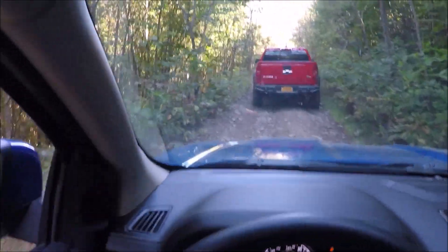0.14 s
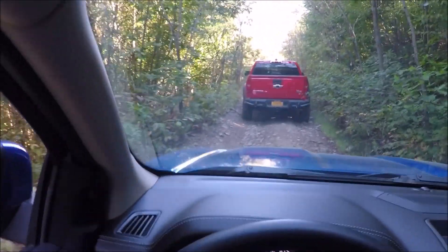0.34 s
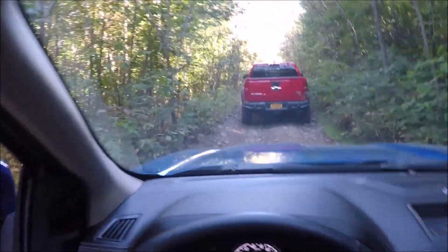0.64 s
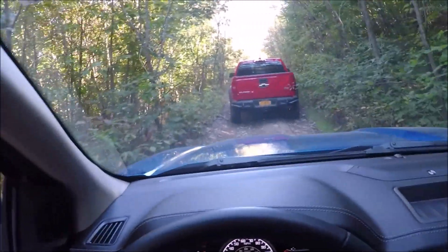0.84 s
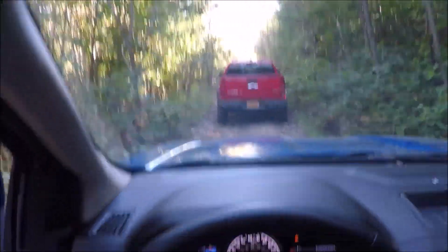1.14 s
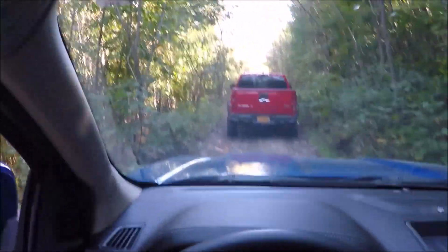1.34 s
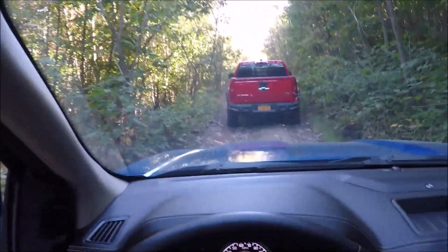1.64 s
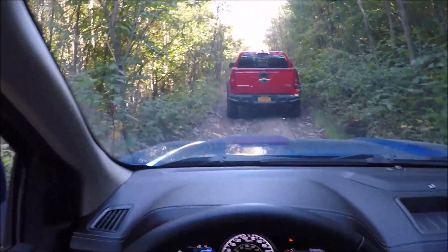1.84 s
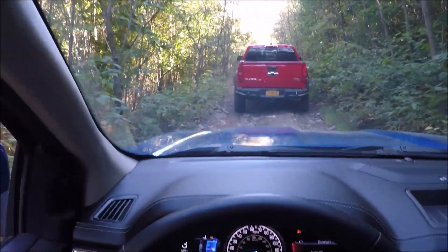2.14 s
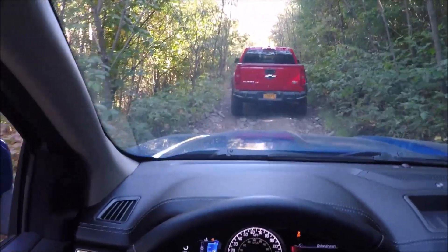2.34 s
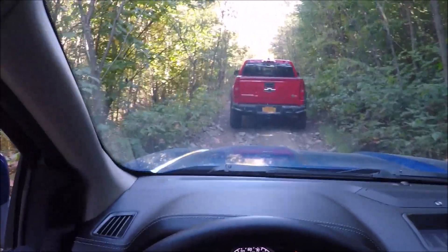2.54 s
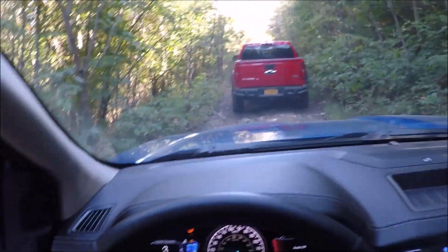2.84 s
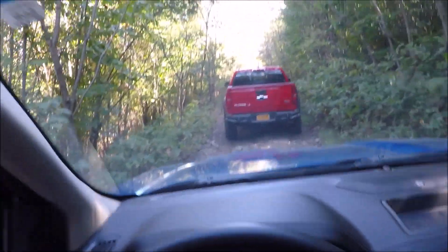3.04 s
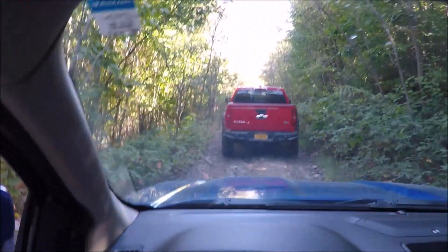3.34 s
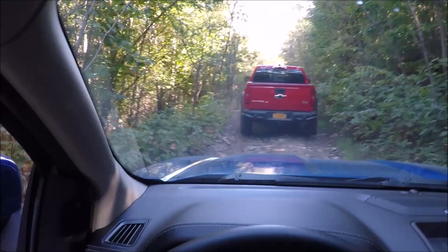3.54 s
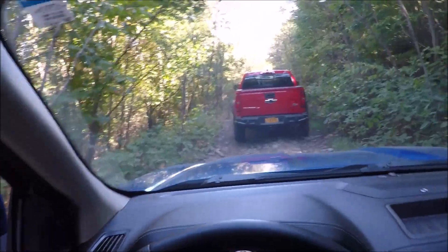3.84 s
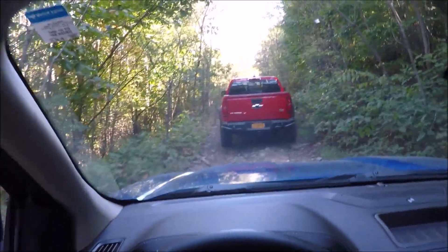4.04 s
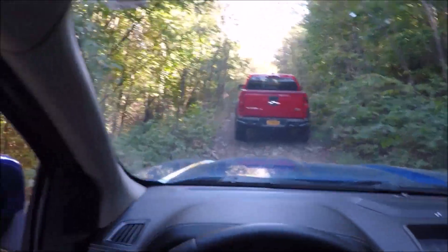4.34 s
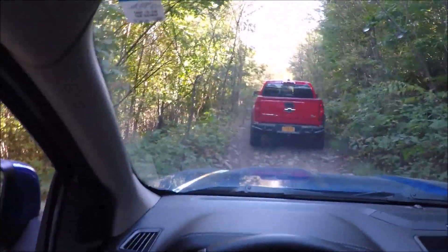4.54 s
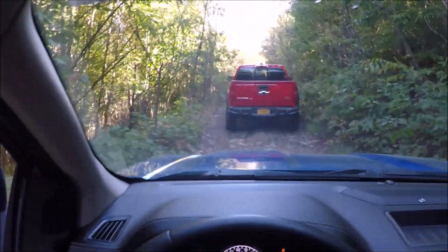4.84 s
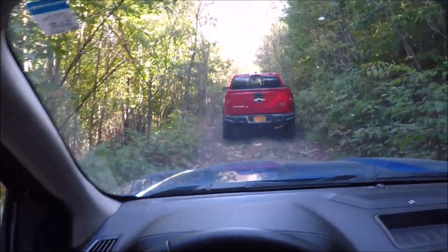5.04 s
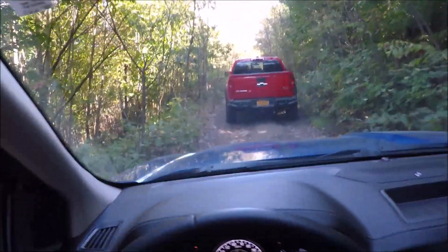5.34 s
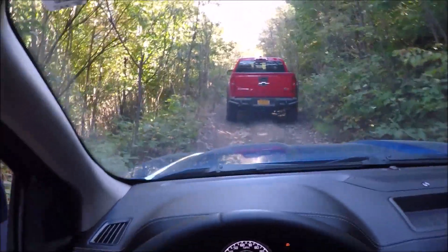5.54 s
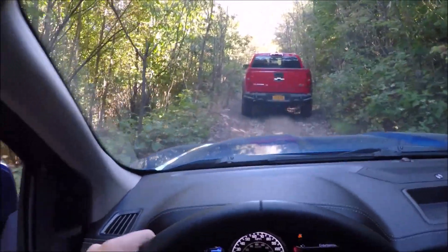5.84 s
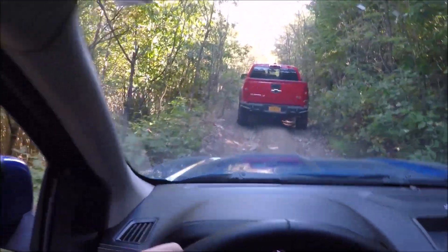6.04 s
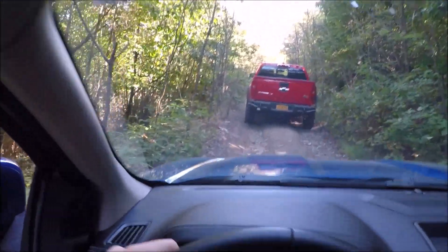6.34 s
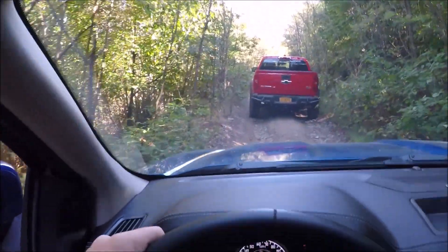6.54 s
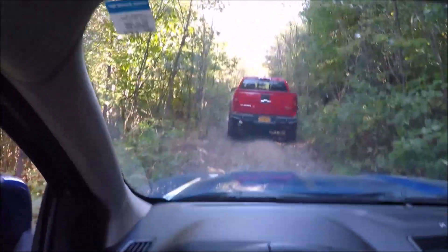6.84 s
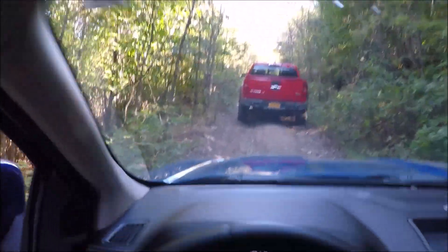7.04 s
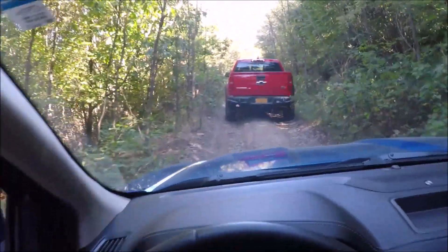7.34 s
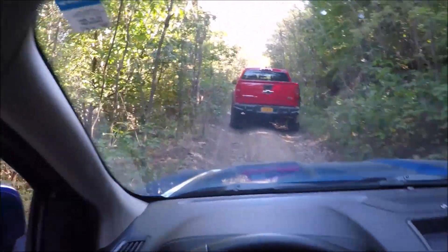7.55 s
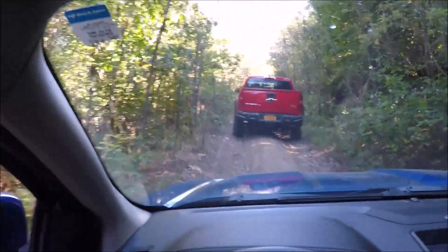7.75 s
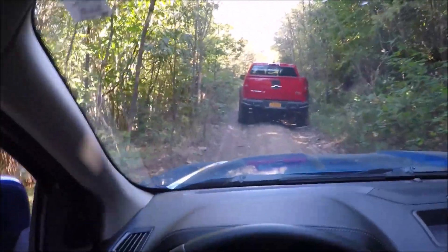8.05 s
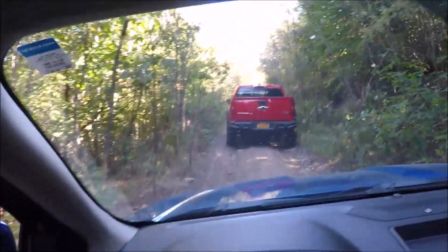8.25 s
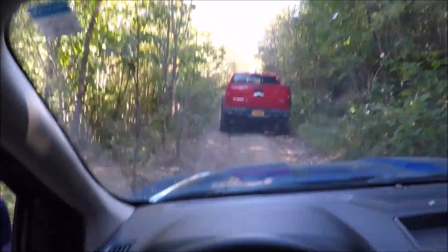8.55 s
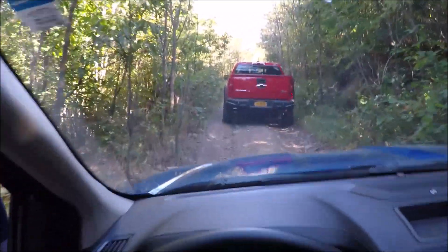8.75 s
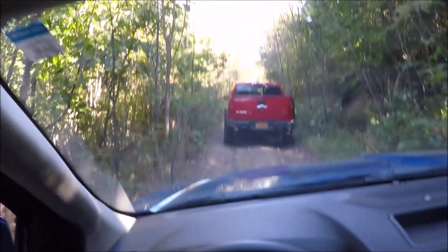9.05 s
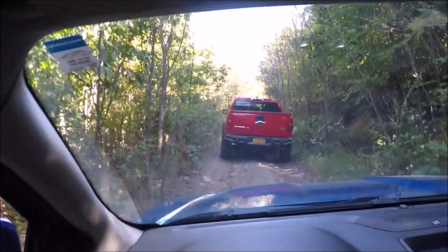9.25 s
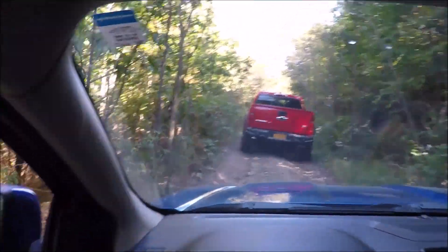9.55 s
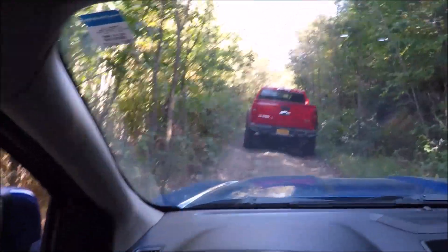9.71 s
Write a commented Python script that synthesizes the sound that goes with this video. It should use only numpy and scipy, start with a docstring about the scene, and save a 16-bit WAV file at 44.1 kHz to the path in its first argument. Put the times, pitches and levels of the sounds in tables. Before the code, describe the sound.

Inside a vehicle cab, a low engine drone sags then pulls again as tyres crunch over dirt, with heavy body booms, knocks and plastic rattles.

```python
"""A truck crawls along a dirt trail

Heard inside the cab: the six-cylinder engine, built from sine tones, eases off, then pulls again with a drone.
Shaped noise makes the body boom, the tyres crunch and the brush sweep along the side.
Loose things knock with short thuds that ring the cab, and bursts of noise rattle the trim.
Thin gliding tones are a twig squeaking on the paint."""
import sys
import numpy as np
from scipy import signal
from scipy.fft import rfft, irfft, next_fast_len
from scipy.io import wavfile
from scipy.ndimage import uniform_filter1d, map_coordinates

SR = 44100
rng = np.random.default_rng(int(sys.argv[2]) if len(sys.argv) > 2 else 0)


def inscribe(sig):
    """Save sig as 16-bit PCM at rate SR to the path in sys.argv[1].

    A 1-D sig is mono; a 2-D sig holds one channel per row.
    Samples are clipped to [-1, 1] before scaling.
    """
    pcm = np.round(np.clip(np.atleast_2d(sig).T, -1, 1) * 32767)
    wavfile.write(sys.argv[1], SR, pcm.astype(np.int16))


N = 435706  # length in samples

# Spectrum shapes of the noises; only the shape counts: f/Hz, level/dB
BOOM_COLOUR = [(10, -40), (18, -16.5), (24, -3), (28, 4), (33, -1), (39, -1.5), (46, -7.5), (56, -17),
               (75, -31), (110, -45), (200, -67)]
FLOOR_COLOUR = [(40, -11.5), (65, 6), (100, 3), (130, 2.5), (143, 5), (156, -0.5), (195, -1.5), (235, -8.5),
                (265, -1), (310, -11.5), (400, -13.5), (700, -50)]
TYRE_COLOUR = [(180, -0.5), (330, -1), (410, 0.5), (490, 0.5), (580, 3), (730, -3), (1000, -3.5),
               (1250, -9.5), (1550, -17.5), (2500, -23), (6000, -67)]
TWIG_COLOUR = [(700, -41), (1500, 2), (2100, 1), (2900, 2.5), (3700, 0.5), (4400, -5.5), (5600, -5.5),
               (6400, -5.5), (7200, -19), (10000, -41)]
LEAF_COLOUR = [(2000, -15), (5000, 2), (7500, 2), (10500, 3.5), (11500, -2), (14500, -1), (16000, -12)]
# Resonances of the door trim and dashboard: f/Hz, width/Hz, level/dB
TRIM_MODES = [(885, 175, 18.5), (1900, 295, 8.5), (2140, 226, 10.5), (2740, 750, 7), (3550, 710, 5),
              (5450, 1070, -2.5), (6000, 670, -0.5), (10040, 1100, -10.5), (13500, 3800, -13)]
# Air in the cab, lifting or dulling tones that pass through: f/Hz, width/Hz, gain/dB
AIR_MODES = [(96.8, 13.4, 13.5), (113, 5.2, -3), (153, 7.1, 3), (260, 7.4, -9), (543.3, 12, 7.5),
             (629, 69, 4.5)]
# Ringing modes of the cab after a knock: f/Hz, level/dB, time to fall 60 dB/s
CAB_MODES = [(118, 5, 0.29), (164.2, 8.5, 0.15), (200, -6, 0.04), (252, -10, 0.072), (337, 4, 0.084),
             (442, 1.5, 0.051), (560, 0.5, 0.091), (624, 0, 0.094), (755, -9, 0.12), (902, -2.5, 0.067)]
# Pace over the dirt, given as tyre noise: t/s, level/dB
PACE = [(0, -48.5), (1.4, -48.5), (2.2, -53), (3.0, -52), (3.9, -50.5), (4.9, -48.5), (6.1, -48),
        (7.9, -47), (8.5, -48.5), (9.88, -47.5)]
# Bushes pressing on the side: t/s, length/s, extra twig scrape/dB, extra leaf hiss/dB
BUSHES = [(-.05, 0.063, 10.5, 14.5), (0.416, 0.22, 2, 4.5), (0.979, 0.2, 3, 4.5), (1.419, .14, 4.5, 4),
          (6.333, 0.33, 4, 5), (6.654, 0.29, 3, 1.5), (6.96, 0.34, 4, 4)]
# Single branches dragging past: t/s, length/s, level/dB, centre f/Hz
BRANCHES = [(0.815, 0.1, -52.5, 3960), (0.045, 0.068, -59, 13000), (1.132, 0.04, -60, 12100),
            (1.453, 0.13, -51, 3150), (4.343, 0.067, -52.5, 2820), (7.118, 0.066, -46.5, 3069),
            (9.449, 0.053, -51, 3030), (9.493, 0.054, -48.5, 7950), (9.544, 0.029, -52, 8500)]
# Twig squeaks, before waver and grip: t/s, length/s, start f/Hz, end f/Hz, level/dB
SQUEAKS = [(0.83, .016, 6230, 6200, -54), (0.852, .026, 6230, 6100, -55), (1.364, .026, 6400, 6330, -55),
           (1.393, 0.035, 6300, 6200, -52), (1.669, 0.058, 6370, 6240, -49),
           (1.719, 0.029, 6430, 6100, -50), (1.747, .026, 8520, 8460, -65)]
# Plastic trim rattles: t/s, level/dB, centre f/Hz, width/Hz, time to fall 60 dB/s
RATTLES = [(0.707, -42, 1750, 900, 0.03), (0.715, -47, 1950, 900, 0.045), (0.834, -43, 4850, 6500, 0.058),
           (0.873, -52, 3400, 3000, 0.027), (0.895, -45.5, 3400, 3500, 0.025),
           (.957, -42, 9000, 13200, 0.058), (.959, -42, 3000, 1200, 0.04), (1.932, -46, 2613, 4026, 0.051),
           (2.888, -48.5, 2395, 3014, 0.049), (3.818, -44, 2697, 1500, 0.05),
           (3.819, -48.5, 6500, 9000, 0.05), (3.8746, -49, 1900, 1800, 0.041),
           (3.918, -53, 12000, 6040, 0.027), (4.049, -39.5, 7540, 9810, 0.041),
           (4.049, -29, 2710, 1300, 0.022), (4.054, -37, 3505, 2480, 0.029),
           (4.403, -42, 2400, 3000, 0.048), (4.71, -39, 3400, 6010, .04), (4.767, -47, 3300, 3500, 0.096),
           (4.866, -46, 4490, 6990, .025), (5.013, -46.5, 2716, 2986, 0.072),
           (5.061, -41, 3717, 5000, 0.12), (5.0933, -40.5, 2800, 2000, 0.084),
           (5.0932, -44, 5700, 4500, 0.088), (5.36, -43.5, 2640, 3600, 0.11),
           (5.88, -46.5, 2100, 2500, 0.047), (5.974, -45, 2200, 2500, .05),
           (6.724, -39.5, 2440, 3010, 0.045), (6.7304, -42, 2800, 2000, 0.03),
           (6.737, -43, 2400, 2500, 0.045), (7.033, -45, 6100, 3500, 0.099),
           (7.148, -37.5, 7000, 10000, .045), (7.147, -34.5, 3400, 2600, 0.063),
           (7.158, -39, 2100, 1400, 0.043), (7.627, -40, 2010, 1300, 0.037),
           (7.741, -44.5, 1900, 1500, 0.047), (8.288, -44, 4455, 2000, .03), (8.293, -52, 3700, 2000, .035),
           (8.649, -52, 8800, 5000, .035), (8.679, -49.5, 5400, 2200, 0.047), (8.7525, -46, 2620, 800, .05),
           (9.447, -50.5, 5700, 1200, 0.055), (9.521, -46, 6500, 9000, .025)]
# Dull knocks of suspension and cargo: t/s, thud level/dB, f/Hz, cab ring level/dB, trim shake level/dB
KNOCKS = [(0.2857, -35, 650, -44, -63), (0.6953, -38, 870, -41, -45), (0.7033, -19.5, 140, -33, -60),
          (0.7103, -10, 229, -32.5, -51), (.7185, -28, 620, -40, -48), (0.7296, -21, 160, -40, -56),
          (0.7693, -8.5, 41.4, -56, -55), (0.8342, -36, 600, -42.5, -58), (1.0504, -27, 760, -41, -47),
          (3.085, -26, 540, -47, -58), (3.0932, -19, 430.2, -45, -58), (3.0947, -32.5, 950, -45, -56),
          (3.1006, -23.5, 190, -41, -68), (3.818, -31, 159.8, -38.5, -60), (4.711, -29, 225, -42, -52),
          (4.049, -24, 427, -38, -44), (4.0581, -20.5, 484, -33, -39), (5.094, -32, 800, -44, -51),
          (5.138, -36, 700, -40, -42), (5.1445, -35, 720, -42, -46), (5.261, -29, 570.7, -40, -53),
          (5.2648, -30, 566.8, -44, -61), (7.139, -33, 899.6, -41, -47), (7.161, -28, 900, -44, -41),
          (7.6254, -33, 870, -38, -40), (7.6305, -28, 952, -42, -48), (7.965, -33, 620, -42, -54),
          (8.1522, -32, 900.6, -39, -41), (8.864, -32.5, 805, -42, -50), (9.585, -32, 419.9, -42, -56),
          (9.7, -35, 330.3, -40, -62)]
# Roughness of the ground, given as body boom before its random wobble: t/s, level/dB
GROUND = [(0, -23), (.5, -20), (.68, -21.5), (.745, -28), (.8, -22), (1.05, -21), (1.45, -23), (1.62, -36),
          (1.75, -22), (1.98, -20.5), (2.15, -25.5), (2.42, -21), (2.66, -26), (2.76, -20.5), (2.87, -41),
          (3.02, -23), (3.3, -25), (3.4, -34), (3.5, -25.5), (3.9, -26), (4.22, -33), (4.5, -25),
          (5.08, -26), (5.25, -21.5), (5.5, -26), (5.9, -22), (6.25, -26), (6.8, -22), (7.17, -25.5),
          (7.35, -29), (7.65, -19), (7.85, -25), (8.17, -17.5), (8.3, -25.5), (8.5, -19), (9.88, -21)]
# Ruts that set the body heaving: t/s, length/s, level/dB
RUTS = [(.785, .09, -14.5), (1.116, 0.11, -18), (5.549, 0.15, -16), (6.397, 0.16, -17),
        (7.262, 0.21, -19.5), (8.379, .18, -20.5), (8.67, 0.26, -19), (9.15, .17, -20), (9.498, 0.17, -19)]
# Engine speed and effort: t/s, firing rate f/Hz, base level/dB
ENGINE = [(0, 96.1, -34.5), (.45, 92.64, -37), (.75, 94.8, -33), (1.05, 88.62, -38), (1.5, 82.85, -39.5),
          (2.1, 71.44, -39), (3.0, 64, -38), (3.45, 62.87, -38.5), (3.75, 80.6, -34), (4.0, 88.32, -37),
          (4.4, 84.4, -35), (4.8, 87.83, -33.5), (5.25, 92.66, -43), (5.75, 94.74, -41), (6.3, 95.84, -54),
          (7.0, 102.6, -50.5), (7.6, 105.8, -38), (8.05, 114.1, -34), (8.25, 115.3, -40),
          (8.47, 110.6, -34), (8.72, 115.3, -35), (9.1, 110.1, -35.5), (9.88, 105.3, -40)]
# Engine overtones: multiple of the firing rate, level over the base level/dB (before the cab air)
OVERTONES = [(1.5, -14.5), (2, -20.5), (2.5, -21), (4, -26.5), (5, -28.5), (6, -34)]
# Rumble at half the firing rate: t/s, level/dB
RUMBLE = [(0, -40), (1.2, -43), (1.7, -30.5), (2.3, -33), (2.85, -35.5), (3.2, -31), (3.4, -36),
          (3.55, -30), (3.95, -27.5), (4.45, -26), (4.75, -27.5), (5.2, -30), (6.1, -32.5), (6.9, -42),
          (7.5, -36), (8.2, -32), (9.0, -34), (9.88, -34.5)]
# Extra tones of a labouring engine: multiple of the firing rate, level over the rumble/dB
LABOUR = [(5 / 6, -16.5), (4 / 3, -20), (3, -25.5), (3.5, -31.5), (4.5, -32), (5.5, -34), (11, -37.5)]
# Gear whines: multiple of the firing rate, level/dB (before the cab air)
WHINES = [(6.3, -66.5), (10.1, -71.5), (18.6, -74)]
# Drone of a belt-driven part, before throb and waver: t/s, f/Hz, level/dB
DRONE = [(0, 238.6, -43.5), (.75, 233, -46), (1.5, 215.8, -50.5), (3.4, 161.4, -58.5), (4.0, 212.7, -55),
         (4.8, 213.3, -57), (5.3, 221.7, -46), (5.6, 226, -50.5), (6.0, 230, -50), (6.32, 232.8, -43),
         (6.4, 246, -46), (6.5, 253, -44.5), (6.7, 260.7, -52.5), (6.85, 263.8, -41.5), (7.0, 264.7, -45),
         (7.17, 266.7, -34.5), (7.35, 269, -38), (7.68, 273.5, -35.5), (7.75, 276, -44), (7.81, 279.9, -35),
         (7.98, 291.2, -37.5), (8.3, 293.8, -41), (8.62, 295.4, -40.5), (8.83, 292, -35), (9.0, 284, -46.5),
         (9.2, 282.2, -47), (9.26, 280, -39), (9.35, 280, -42), (9.5, 279, -37.5), (9.6, 278.2, -39.5),
         (9.68, 271, -39), (9.88, 272.1, -37)]

PAN_DB = -38.5  # floor pan at the mean pace
# Twigs and leaves at the mean pace, outside the bushes; dB they gain per dB of pace
TWIG_DB, TWIG_FOLLOWS = -59.5, 0.71
LEAF_DB, LEAF_FOLLOWS = -71.5, 0.39
BUSH_ATTACK_S, BUSH_RELEASE_S = 0.034, 0.061
RUT_ATTACK_S, RUT_RELEASE_S = 0.019, 0.043
SHAKE_HZ, SHAKE_T60_S = 1990, 0.053  # the trim's answer to a knock
RATTLE_ATTACK_S = 0.0011
# Faint chance rattles; TICK_HZ is the middle of their pitch range
TICKS_PER_S, TICK_DB, TICK_HZ, TICK_T60_S = 0.89, -52, 3000, 0.069
PIECE_DB, PIECE_T60_S = -14.5, 0.031  # a rattling piece's own note, against its rattle level
TOP_HZ = 15300  # nothing above this is kept


def amp(db):
    """Turn decibels into gain."""
    return 10 ** (np.asarray(db) / 20)


def unit(x):
    """Scale to an average strength (rms) of 1."""
    return x / np.sqrt(np.mean(x ** 2) + 1e-20)


def curves(rows):
    """Draw straight lines between table rows: one curve for each column after the time."""
    s, *columns = np.transpose(rows)
    return [np.interp(np.arange(N) / SR, s, column) for column in columns]


def wobble(rate):
    """A smooth random curve through `rate` random points a second."""
    points = rng.standard_normal(int(N * rate / SR) + 4)
    return map_coordinates(points, [np.arange(N) * rate / SR])


def filtered(x, response):
    """Change the strength of each frequency in x by a response."""
    m = next_fast_len(len(x) + 8192)
    spectrum = rfft(x, m) * response(np.fft.rfftfreq(m, 1 / SR))
    return irfft(spectrum, m)[:len(x)]


def coloured(x, spectrum):
    """Shape x by a spectrum table, at rms 1."""
    f, db = np.transpose(spectrum)

    def response(hz):
        return amp(np.interp(np.log(hz + 1), np.log(f), db, left=-100, right=-100))

    return unit(filtered(x, response))


def resonance(f, centre, width):
    """Response of one damped vibration, strongest at its centre."""
    return 1j * f * width / (centre ** 2 - f * f + 1j * f * width)


def add(track, s, sound):
    """Mix a sound into the track from time s, in seconds."""
    part = track[round(s * SR):][:len(sound)]
    part += sound[:len(part)]


def grit(rate, spread_db, share):
    """Noise with a share of its power in sparse little impacts, `rate` a second."""
    happens = rng.random(N) < rate / SR
    strength = rng.standard_normal(N)
    hits = happens * strength * amp(spread_db * rng.standard_normal(N).clip(-2, 2))
    return np.sqrt(share) * unit(hits) + np.sqrt(1 - share) * rng.standard_normal(N)


def tone(hz, flutter_db, rate):
    """A sine of rms 1 whose strength flutters."""
    cycles = np.cumsum(hz) / SR + rng.random()
    return unit(np.sin(2 * np.pi * cycles) * amp(flutter_db * wobble(rate)))


def envelope(s, length, attack_s, release_s):
    """Gain that rises from time s, holds, and falls away once the length is over."""
    t = np.arange(N) / SR - s
    return np.clip(t / attack_s, 0, 1) * np.clip(1 - (t - length) / release_s, 0, 1)


def trim(f):
    """Response of the door trim and dashboard: several resonances with alternating signs."""
    return sum((-1) ** k * amp(db) * resonance(f, hz, width) for k, (hz, width, db) in enumerate(TRIM_MODES))


def cab_lift(hz):
    """Gain in dB that the air in the cab gives a tone, largest at the centre of a mode."""
    return sum(db / (1 + (2 * (hz - centre) / width) ** 2) for centre, width, db in AIR_MODES)


def pace():
    """Mean level of the tyre noise, and how far it lies above that at each moment, in dB."""
    db, = curves(PACE)
    return db.mean(), db - db.mean()


def brush():
    """Twigs scratch and leaves hiss along the doors, more with pace and in bushes; single branches swell past."""
    _, pace_db = pace()
    twig_db = TWIG_DB + TWIG_FOLLOWS * pace_db
    leaf_db = LEAF_DB + LEAF_FOLLOWS * pace_db
    for s, length, scrape_db, hiss_db in BUSHES:
        press = envelope(s, length, BUSH_ATTACK_S, BUSH_RELEASE_S)
        twig_db = twig_db + scrape_db * press
        leaf_db = leaf_db + hiss_db * press
    touch = wobble(35)  # shared by twigs and leaves
    scratch = grit(rate=1500, spread_db=4.5, share=0.083)
    twigs = amp(twig_db + 1.08 * touch) * coloured(scratch, TWIG_COLOUR)
    patter = grit(rate=2000, spread_db=3, share=0.2)
    leaves = amp(leaf_db + 1.55 * touch + 0.62 * wobble(22)) * coloured(patter, LEAF_COLOUR)
    for s, length, db, centre_hz in BRANCHES:
        drag = np.hanning(round(length * SR))
        noise = rng.standard_normal(len(drag))
        scrape = filtered(noise, lambda f: trim(f) * resonance(f, centre_hz, centre_hz))
        add(twigs, s, amp(db) * drag * unit(scrape))
    return twigs + leaves


def squeaks():
    """A twig sticks and slips on the paint: a gliding sine with a wavering pitch and unsteady strength."""
    out = np.zeros(N)
    waver_hz = 70 * wobble(500)
    grip = unit(amp(3.5 * wobble(110)))
    for s, length, start_hz, end_hz, db in SQUEAKS:
        progress = np.linspace(0, 1, round(length * SR))
        waver = waver_hz[round(s * SR):][:len(progress)]
        hz = start_hz + (end_hz - start_hz) * progress + waver
        swell = np.sin(np.pi * progress)
        add(out, s, amp(db) * swell * np.sin(2 * np.pi * np.cumsum(hz) / SR))
    return grip * out


def rattles():
    """Trim pieces chatter and ring briefly: on their own, at each knock, and faintly by chance."""
    out, t = np.zeros(N), np.arange(SR // 5) / SR
    shaken = [(s, shake_db, SHAKE_HZ, 2.2 * SHAKE_HZ, SHAKE_T60_S) for s, *_, shake_db in KNOCKS]
    chances = rng.random((round(TICKS_PER_S * N / SR), 2))
    ticks = [(when * N / SR, TICK_DB, TICK_HZ * 2 ** (size - 0.5), TICK_HZ, TICK_T60_S)
             for when, size in chances]
    attack = 1 - np.exp(-t / RATTLE_ATTACK_S)
    for s, db, centre_hz, width_hz, t60 in RATTLES + shaken + ticks:
        fade = amp(-60 * t / t60) * attack
        # the strength jumps every 64 samples, like uneven contacts
        contacts = amp(3 * rng.standard_normal(len(t) // 64 + 1)).repeat(64)[:len(t)]
        chatter = rng.standard_normal(len(t)) * contacts * fade
        sound = filtered(chatter, lambda f: trim(f) * resonance(f, centre_hz, width_hz) ** 2)
        rattle = unit(sound) * np.sqrt(np.mean(fade ** 2))
        note_fade = amp(PIECE_DB - 60 * t / PIECE_T60_S) * attack
        note = note_fade * np.sin(2 * np.pi * centre_hz * t)
        add(out, s, amp(db) * (rattle + note))
    return out


def knocks():
    """Each blow is a thud of a cycle or two, which rings most the cab modes near its pitch."""
    out, t = np.zeros(N), np.arange(SR // 4) / SR
    build_up = 1 - np.exp(-t / 0.0022)  # the cab answers a moment after the blow
    for s, db, pitch_hz, ring_db, _ in KNOCKS:
        cycles = pitch_hz * t
        swell = cycles / 0.48  # the thud's envelope peaks at about half a cycle
        thud = -np.sin(2 * np.pi * cycles) * swell ** 2 * np.exp(2 * (1 - swell))
        ring = np.zeros(len(t))
        for hz, level, t60 in CAB_MODES:
            nearness = abs(resonance(hz, pitch_hz, 1.2 * pitch_hz))
            ring += amp(level - 60 * t / t60) * nearness * np.sin(2 * np.pi * (hz * t + rng.random()))
        noise = rng.standard_normal(len(t))
        scatter = unit(filtered(noise, lambda f: resonance(f, pitch_hz, pitch_hz) ** 2))
        tail = ring + amp(-7.5) * scatter * amp(-60 * t / 0.059)
        add(out, s, amp(db) * thud + amp(ring_db) * build_up * tail)
    return out


def rolling():
    """Tyres on dirt and stones, as floor-pan noise and gritty crunch; both grow with the pace."""
    mean_db, pace_db = pace()
    pan_gain = amp(PAN_DB + pace_db + 0.65 * wobble(11))
    pan = pan_gain * coloured(rng.standard_normal(N), FLOOR_COLOUR)
    stones = amp(0.8 * wobble(16)) * grit(rate=700, spread_db=2.5, share=0.2)
    return pan + amp(mean_db + pace_db) * coloured(stones, TYRE_COLOUR)


def boom():
    """The body heaves at low frequencies, as hard as the ground and its ruts shake it."""
    ground_db, = curves(GROUND)
    shake = amp(ground_db + 2.06 * wobble(17))
    ruts = sum(amp(db) * envelope(s, length, RUT_ATTACK_S, RUT_RELEASE_S) for s, length, db in RUTS)
    sway = signal.hilbert(coloured(rng.standard_normal(N), BOOM_COLOUR))
    # even out the noise's own swells, so that the ground sets the strength
    power = uniform_filter1d(np.abs(sway) ** 2, size=SR // 14)
    strength = np.sqrt(np.abs(power) + 1e-3)
    return np.hypot(shake, ruts) * unit(sway.real / strength)


def engine():
    """Rumble, firing tone, overtones from unequal cylinders that swell in the cab air, gear whines and drone."""
    firing_hz, base_db = curves(ENGINE)
    drone_hz, drone_db = curves(DRONE)
    firing = amp(base_db + 0.4) * tone(firing_hz, flutter_db=1.4, rate=14)
    overtones = np.zeros(N)
    for k, level in OVERTONES:
        gain = amp(base_db + level + cab_lift(k * firing_hz))
        overtones += gain * tone(k * firing_hz, flutter_db=2.5, rate=9)
    whines = np.zeros(N)
    for k, level in WHINES:
        gain = amp(level + cab_lift(k * firing_hz))
        whines += gain * tone(k * firing_hz + 13 * wobble(60), flutter_db=6.5, rate=14)

    cycle_hz = firing_hz / 6  # six firings in each engine cycle
    throb = 1 + 0.29 * tone(cycle_hz, flutter_db=3.5, rate=5.3)  # the belt's pull varies once per cycle
    drone = amp(drone_db) * throb * tone(drone_hz + 3.17 * wobble(55), flutter_db=1.95, rate=26)
    octave_gain = amp(drone_db - 27 + cab_lift(2 * drone_hz))
    drone_octave = octave_gain * tone(2 * drone_hz, flutter_db=4.5, rate=30)

    rumble_db, = curves(RUMBLE)
    rumble = amp(rumble_db) * tone(firing_hz / 2, flutter_db=2.0, rate=8)
    labour = np.zeros(N)
    for k, level in LABOUR:
        unsteady_hz = k * (firing_hz + 0.698 * wobble(25))
        labour += amp(rumble_db + level) * tone(unsteady_hz, flutter_db=2.5, rate=11)
    return rumble + labour + firing + overtones + whines + drone + drone_octave


def scene():
    """All the sounds in the cab, added up into one channel."""
    background = brush() + squeaks() + rattles() + knocks()
    return (background + rolling() + boom() + engine())[None]


def record(dry):
    """Ease the sound in and out over 8 ms and remove everything from TOP_HZ up."""
    t = np.arange(N) / SR
    ease = np.minimum(np.minimum(t, t[::-1]) / 0.008, 1)
    return np.array([filtered(ease * channel, lambda hz: hz < TOP_HZ) for channel in dry])


dry = scene()
out = record(dry)
inscribe(out)
```